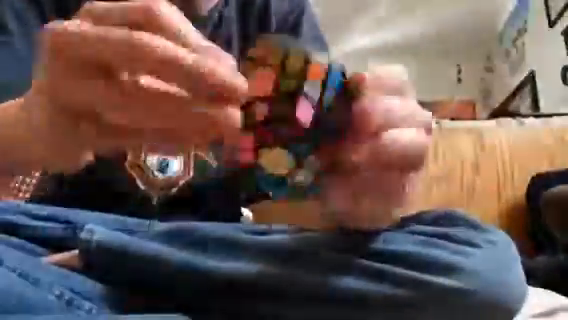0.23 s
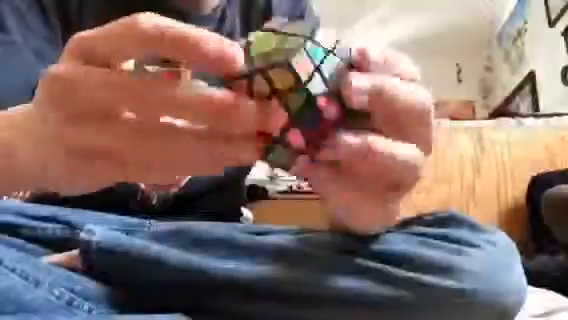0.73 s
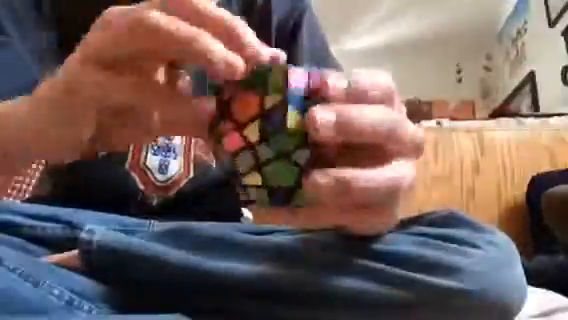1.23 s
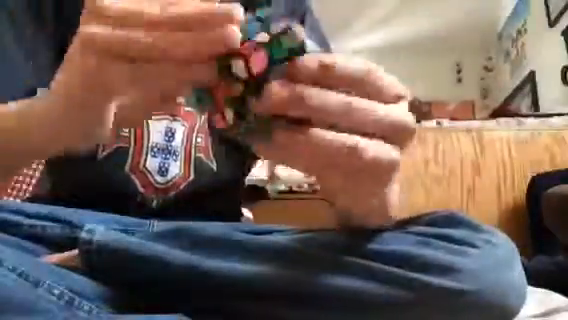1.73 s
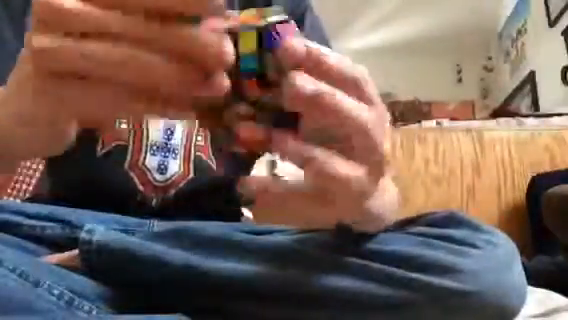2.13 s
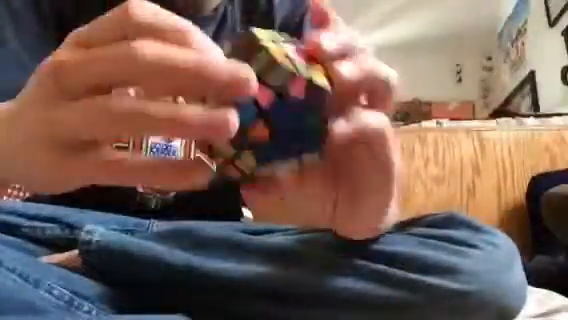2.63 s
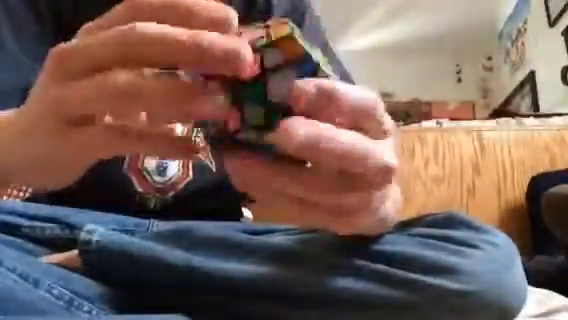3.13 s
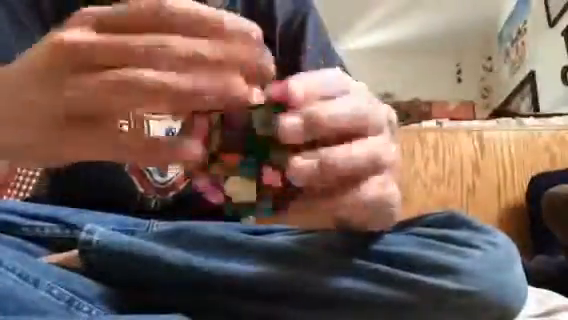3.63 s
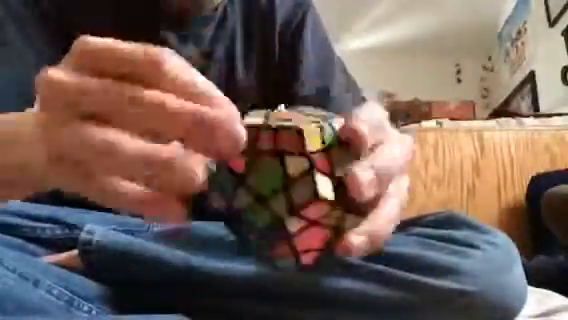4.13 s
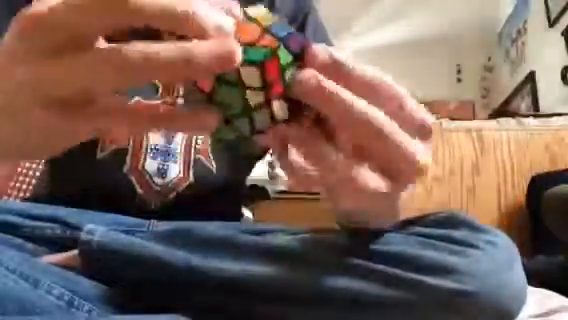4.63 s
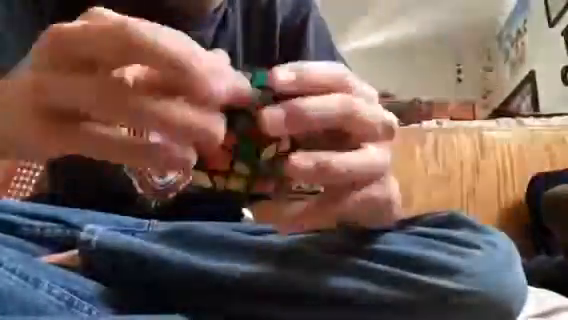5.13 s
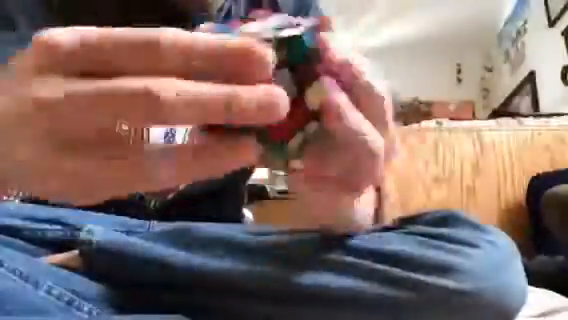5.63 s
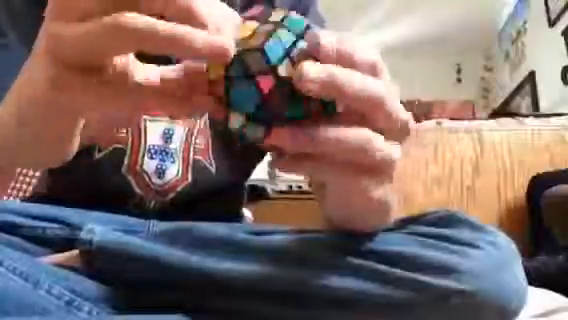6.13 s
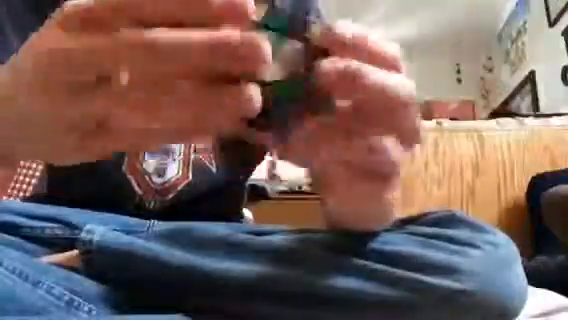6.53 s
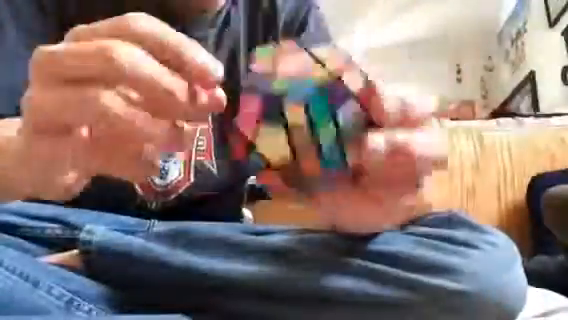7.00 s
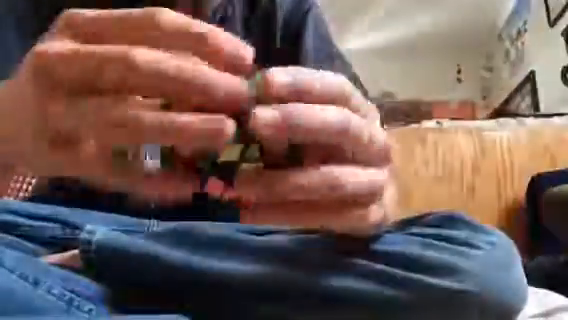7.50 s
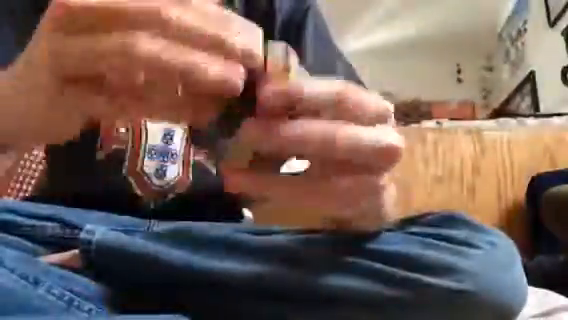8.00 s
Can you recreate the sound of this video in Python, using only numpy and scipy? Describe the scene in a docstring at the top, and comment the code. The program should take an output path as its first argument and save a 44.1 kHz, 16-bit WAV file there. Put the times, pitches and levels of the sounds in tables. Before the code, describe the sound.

Close to the microphone in a quiet room, a small hollow plastic puzzle is twisted by hand. A very loud double snap comes at once, then irregular light clicks, ticks and short dry scrapes. The turning gets denser around four seconds with a cluster of hard clacks, continues unevenly, snaps loudly again near six seconds, thins out, and ends on one more strong clack. Faint hum and hiss lie beneath.

```python
"""Twisty puzzle turned by hand

A small plastic puzzle is turned quickly, close to a microphone in a quiet room. Clicks: noise-burst forces
drive a bright edge snap and the ringing modes of the hollow body. Slides and handling: friction noise made of
tiny slips; thuds: short low sines; floor: hum, rumble, hiss. A block-wise noise suppressor turns quiet moments
down, cutting into the room's answer to each clack."""
import sys
import numpy as np
from scipy import signal
from scipy.io import wavfile
from scipy.ndimage import uniform_filter1d

SR = 44100
rng = np.random.default_rng(int(sys.argv[2]) if len(sys.argv) > 2 else 0)


def to_wav(sig):
    """Store sig (one row per channel, or 1-D mono) as 16-bit WAV at the path in sys.argv[1].

    Samples outside -1..1 are clipped; the rate is SR.
    """
    pcm = np.clip(np.atleast_2d(sig), -1, 1) * 32767
    pcm = np.round(pcm).astype(np.int16)
    wavfile.write(sys.argv[1], SR, pcm.T)  # frames by channels


N = 364266


def amp(db):
    """Decibels to gain."""
    return 10 ** (np.asarray(db) / 20)


def evened(x):
    """Scales to rms 1."""
    return x / np.sqrt(np.mean(x ** 2) + 1e-20)


def per_ms(x):
    """Scales a short sound to the energy of one millisecond at rms 1."""
    energy_ms = np.sum(x ** 2) * 1000 / SR
    return x / np.sqrt(energy_ms + 1e-20)


def read(points, hz):
    """Interpolates a table along a log-frequency axis."""
    f, value = np.transpose(points)
    return np.interp(np.log(hz + 1), np.log(f + 1), value)


def add(mix, start_s, sound):
    """Adds a sound into the mix, in place."""
    part = mix[max(round(start_s * SR), 0):][:len(sound)]
    part += sound[:len(part)]


def causal(gain_db):
    """Minimum-phase impulse response with the given half spectrum."""
    log_gain = np.log(amp(np.r_[gain_db, gain_db[-2:0:-1]]))
    spectrum = np.exp(np.conj(signal.hilbert(log_gain)))
    return np.fft.ifft(spectrum).real


def coloured(x, spectrum, size=4096):
    """Filters x through a spectrum; white input keeps its power."""
    taps = causal(read(spectrum, np.fft.rfftfreq(size, 1 / SR)))
    taps = taps / np.linalg.norm(taps)
    return signal.oaconvolve(x, taps)[:len(x)]


# pieces snapping into line: [t/s, snap level/dB, hollow knock level/dB, brightness (tilt of the snap)]
CLICK_EVENTS = [(0.0884, -10, -19, 6.5), (.0919, -7.5, -19.5, 5.5), (.101, -21, -26.5, 4),
                (0.181, -39.5, -32, 4), (0.21, -37.5, -48, -2), (0.251, -28.5, -62, 5.5),
                (0.2795, -40, -41, -5), (0.3497, -33.5, -35, -1.5), (.44, -36.5, -42.5, -12),
                (0.4793, -43, -43, 7), (0.5108, -44, -39, 0), (.633, -42, -44, 6),
                (.783, -32.5, -34.5, -7.5), (0.959, -42.5, -36.5, 4), (1.2216, -44.5, -40.5, -34),
                (1.2858, -28, -28, -1), (1.2902, -17.5, -22, 3.5), (1.3433, -46, -38, -17),
                (1.3522, -39.5, -41.5, -1), (1.4138, -41.5, -39, -23), (1.4877, -39.5, -43, 5),
                (1.5144, -27, -44.5, -2), (1.5852, -45, -37, -1.5), (1.6331, -46, -31, -16),
                (1.646, -37, -35, 1), (1.69, -30.5, -31.5, 3), (1.7588, -32, -34, -9),
                (1.7898, -40, -42.5, 2), (1.8447, -42, -41, 0), (1.9706, -47, -35, -9),
                (2.003, -45, -44, -5), (2.1073, -25, -31, 4.5), (2.165, -36.5, -44, -5),
                (2.2223, -32.5, -36.5, 1), (2.262, -20.5, -22, -0.5), (2.388, -39.5, -35.5, -14),
                (2.5671, -29.5, -37.5, 2.5), (2.7638, -38, -41, -9), (2.9568, -41, -41.5, -10),
                (2.9976, -38.5, -35.5, -13), (3.2181, -35, -37.5, -19), (3.3522, -36.5, -40.5, -5),
                (3.378, -42, -44, -12), (3.455, -36, -53, -3.5), (3.4886, -23.5, -31.5, -5),
                (3.5208, -25, -25, -3), (3.6822, -25.5, -28, 4.5), (3.692, -23.5, -27.5, 6),
                (3.7088, -32.5, -36.5, -2), (3.8006, -37.5, -55, -2), (3.8147, -29.5, -41.5, -4.5),
                (3.8275, -38.5, -46, -16), (3.868, -33, -36, -6.5), (3.943, -35, -33, 5),
                (3.9813, -32, -35, -6), (4.0315, -31.5, -29, 1), (4.0521, -37.5, -40, -2),
                (4.115, -43, -39, -22), (4.164, -34, -31.5, -2.5), (4.2061, -19, -24.5, 3.5),
                (4.2105, -19, -24.5, 0), (4.2218, -29, -35, 12), (4.2587, -21.5, -22, 6),
                (4.2745, -11, -28, 5), (4.306, -52, -32.5, -5), (4.3344, -37.5, -29.5, 2),
                (4.357, -39, -36, -2), (4.437, -41, -32.5, -2), (4.4531, -46.5, -31, 15),
                (4.4772, -36.5, -36.5, -15), (4.515, -40, -43, -1), (4.54, -42.5, -36, -9),
                (4.597, -42, -33, -4), (4.6112, -38, -40, 8), (4.6269, -37.5, -35.5, 3),
                (4.8124, -42, -33, -1), (4.9274, -44, -39.5, -19), (5.0557, -31.5, -26.5, -3),
                (5.119, -40, -39.5, -14), (5.207, -30, -38, 5), (5.2796, -38, -39.5, -9),
                (5.2905, -25, -34, -1.5), (5.3306, -39, -39, -8), (5.373, -23, -33, 1.5),
                (5.4022, -32.5, -39, -11), (5.4465, -44, -33, 4), (5.5367, -41.5, -37, 9),
                (5.6074, -36, -32, -17), (5.7383, -39, -44, 8), (5.7723, -36, -40, -7),
                (5.7947, -21.5, -30.5, 2.5), (5.8611, -30, -45, -4), (5.885, -32, -32, 4),
                (5.956, -30, -35.5, 3), (5.9769, -29, -29, -12), (6.0093, -36.5, -35, -15),
                (6.064, -9.5, -19.5, 4.5), (6.069, -19.5, -22, -2), (6.072, -32, -19, -9),
                (6.118, -34, -36.5, -0.5), (6.177, -38.5, -40, -4), (6.2721, -41.5, -34, -4),
                (6.2925, -37.5, -39, -4), (6.4418, -40.5, -39.5, -10), (6.5514, -37, -42, 21),
                (6.5796, -36.5, -36.5, -1.5), (6.665, -22, -27.5, 4), (6.856, -44, -37.5, -4.5),
                (7.095, -49, -40.5, -10), (7.323, -45, -39, -8), (7.452, -36.5, -37, -12),
                (7.5068, -23.5, -31.5, -2.5), (7.5944, -37, -39.5, -3), (7.6017, -34.5, -39.5, 0),
                (7.62, -36, -41, -0.5), (7.6582, -26, -26, -1), (7.7183, -44, -40.5, 1),
                (7.767, -37.5, -36, -3), (7.8115, -34, -31, -3), (7.831, -32, -39, 1),
                (7.8453, -34, -33, -6), (7.8826, -35, -27, -9), (7.8986, -36.5, -37.5, -2),
                (8.0058, -27.5, -30.5, -2.5), (8.14, -28.5, -27.5, 0), (8.146, -30.5, -27, -13),
                (8.178, -14.5, -23, 1.5)]
# a glancing snap is brief, a full knock presses longer: [knock over snap level/dB, contact t/s]
CONTACT_TIMES = [(-9, 0.0011), (0, 0.0014)]
# a struck piece tips over and strikes again, softer
REBOUND_S, REBOUND_DB = 0.0039, -18
# the pieces push on the body a moment before the edge snaps free
KNOCK_LEAD_S = 0.0009
# room for the scuff before landing
LEAD_S = 0.008


def clicks(rows, snap_db=0, knock_db=0.0, size=1400):
    """Each impact, with its rebound, is a force that makes a bright snap and a hollow knock."""
    out = np.zeros(N)
    t = np.arange(size) / SR - LEAD_S
    for s, hard_db, hollow_db, brightness in rows:
        contact_s = np.interp(hollow_db - hard_db, *np.transpose(CONTACT_TIMES))
        rebound = amp(REBOUND_DB) * contact(t - REBOUND_S, contact_s)
        force = contact(t, contact_s) + rebound
        add(out, s - LEAD_S, amp(hard_db + snap_db) * snap(force, brightness))
        add(out, s - LEAD_S - KNOCK_LEAD_S, amp(hollow_db + knock_db) * knock(force))
    return out


def contact(t, contact_s, chatter_db=-17, chatter_s=0.0041, scuff_db=-16, scuff_s=0.0015):
    """Noisy force: an edge scuffs up to its stop, lands at t = 0 and chatters against its neighbours."""
    chatter = amp(chatter_db) * np.exp(-abs(t) / chatter_s)
    landing = np.exp(-abs(t) / contact_s) + chatter
    scuff = amp(scuff_db) * np.exp(-abs(t) / scuff_s)
    return rng.standard_normal(len(t)) * np.where(t < 0, scuff, landing)


# colour of a plastic edge snapping, before the brightness tilt: [f/Hz, level/dB]
SNAP_COLOUR = [(300, -35), (1000, -32), (2000, -9), (3000, -11.5), (5100, -0.5), (6200, -1.5), (7700, -1),
               (9500, -8), (12000, -13.5), (14500, -17), (16500, -30)]


def snap(force, brightness):
    """The bright crack of the stiff plastic edge; a sharper contact lifts the top over the middle."""
    hz = np.fft.rfftfreq(len(force), 1 / SR)
    tilt_db = brightness * read([(4000, -0.78), (11000, 0.88)], hz)
    taps = causal(read(SNAP_COLOUR, hz) + tilt_db)
    return per_ms(signal.fftconvolve(force, taps)[:len(force)])


# modes of the hollow body: [nominal f/Hz, relative level/dB, longest t60/s]
BODY_MODES = [(461, -7.5, 0.01), (590, -3, 0.0083), (720, -11, 0.01), (1200, -3.5, 0.017),
              (1392, 0.5, 0.01), (1654, -3, 0.011), (1791, -12.5, 0.0048), (2160, -6, 0.0064)]


def knock(force, detune=0.04, damping=0.15):
    """The same force rings the body; each grip shifts and damps its modes anew."""
    t = np.arange(len(force)) / SR
    hz, db, t60_s = np.transpose(BODY_MODES)[:, :, None]
    shift, side = rng.standard_normal((2, len(BODY_MODES), 1))
    ring_s = t60_s * np.exp(-damping * abs(side))
    decay = np.sign(side) * amp(db - 60 * t / ring_s)
    modes = decay * np.sin(2 * np.pi * hz * (1 + detune * shift) * t)
    return per_ms(signal.fftconvolve(force, modes.sum(0))[:len(t)])


# a face sliding freely through a longer turn: [start t/s, length t/s, relative level/dB]
SLIDE_EVENTS = [(0.09, .037, -39), (1.307, 0.048, -46.5), (1.629, 0.033, -45.5), (1.897, 0.043, -50.5),
                (1.982, 0.03, -42), (2.208, 0.031, -46), (2.317, 0.032, -48), (2.541, 0.029, -43.5),
                (2.992, 0.018, -45), (3.05, 0.031, -48), (3.123, 0.024, -47), (3.498, 0.043, -43),
                (3.667, 0.035, -39.5), (3.748, 0.024, -45.5), (3.848, .04, -45), (4.265, 0.017, -27),
                (4.429, 0.027, -47.5), (4.553, .051, -47.5), (4.723, 0.014, -43), (5.037, .04, -40.5),
                (5.121, 0.028, -49.5), (5.451, 0.076, -47), (5.699, 0.066, -50), (5.876, 0.025, -45.5),
                (5.975, 0.063, -49.5), (6.124, .044, -45.5), (6.534, 0.043, -46.5), (7.646, 0.034, -35),
                (7.81, 0.037, -56), (7.933, 0.042, -46.5)]
# colour of plastic rubbing on plastic: [f/Hz, relative level/dB]
RUB_COLOUR = [(150, -12.5), (400, 0), (900, -3.5), (1250, 10), (1700, 6), (3000, -1.5), (5000, 1),
              (7500, -2.5), (10000, -4), (14500, -10.5), (16500, -24)]


def slides(level_db=-2, taper=0.64, jolt_db=-9):
    """Pieces scrape over each other during a slide, and catch now and then on an edge."""
    out = np.zeros(N)
    jolts = grit(per_s=68, spread_db=0.5, smooth=0)
    slips = grit(per_s=550, spread_db=3.0, smooth=0.15) + amp(jolt_db) * jolts
    for start_s, length_s, db in SLIDE_EVENTS:
        stroke = slips[round(start_s * SR):][:max(round(length_s * SR), 20)]
        swell = signal.windows.tukey(len(stroke), taper)
        add(out, start_s, amp(db + level_db) * evened(stroke) * swell)
    return coloured(out, RUB_COLOUR)


def grit(per_s, spread_db, smooth):
    """Tiny slips of uneven size, each a brief rasp, over smooth friction noise; rms 1."""
    happens = rng.random(N) < per_s / SR
    sizes = amp(spread_db * np.minimum(rng.exponential(1, N), 3)) * happens
    rasp = evened(signal.oaconvolve(sizes, signal.windows.hann(40))[:N])
    return evened((rasp + smooth) * rng.standard_normal(N))


# how busily the fingers shift their grip on the loose pieces: [t/s, relative level/dB]
HANDLING_CURVE = [(0, -52.5), (.4, -66), (.6, -66), (1.15, -66.5), (1.399, -61), (1.798, -61), (2.3, -62),
                  (2.8, -72), (3.05, -64.5), (3.3, -66), (3.6, -64), (4.1, -63.5), (4.45, -59), (4.95, -63),
                  (5.449, -59.5), (5.85, -56.5), (6.348, -65), (7.3, -70), (7.95, -58.5), (8.25, -63)]


def handling(rub_db=0.5, tick_db=6.0, hollow_db=3, dull_db=0, spread_db=4, count=320):
    """Skin rubs faintly on the faces, and loose pieces tick at random under the fingers."""
    s, db = np.transpose(HANDLING_CURVE)
    grip = amp(np.interp(np.arange(N) / SR, s, db) + rub_db)
    rub = coloured(grip * grit(per_s=240, spread_db=8, smooth=0.65), RUB_COLOUR)
    when_s = rng.uniform(LEAD_S, N / SR, count)
    spread = np.clip(rng.standard_normal((count, 3)), -2, 2)
    hard, hollow, brightness = spread_db * spread.T
    level_db = np.interp(when_s, s, db) + tick_db
    ticks = zip(when_s, level_db + hard, level_db + hollow + hollow_db, brightness + dull_db)
    return rub + clicks(ticks)


# dull low thuds, the first under the opening clack: [t/s, peak level/dB, f/Hz, length t/s]
THUD_EVENTS = [(.088, -30, 570, .011), (4.554, -42, 172, .026), (6.464, -43, 430, .012)]


def thuds(taper=0.73):
    """Dull, low thuds: sines that swell and fade."""
    out = np.zeros(N)
    for s, db, hz, length_s in THUD_EVENTS:
        t = np.arange(0, length_s, 1 / SR)
        swell = signal.windows.tukey(len(t), taper)
        add(out, s, amp(db) * swell * np.sin(2 * np.pi * hz * t))
    return out


# room decay: [f/Hz, t60/s]
ROOM_DECAY = [(300, 0.57), (1500, 0.3), (14000, 0.084)]


def room(x, first_s=0.0037, near_db=9, near_s=0.0075, size=16384):
    """Close reflections from hands and lap, then a short tail that is duller the later it comes."""
    echoes_per_s = 3000
    taps = rng.choice([-1., 1.], size) * (rng.random(size) < echoes_per_s / SR)
    late_s = np.arange(size) / SR - first_s
    taps *= (late_s > 0) * (1 + amp(near_db) * np.exp(-abs(late_s) / near_s))
    hz, t, bands = signal.stft(taps, SR, nperseg=128)
    decay = amp(-60 * t / read(ROOM_DECAY, hz)[:, None])
    tail = signal.istft(bands * decay, SR)[1]
    return signal.fftconvolve(x, tail / np.linalg.norm(tail))[:N]


# faint mains and appliance hum: [f/Hz, rms level/dB]
HUM_TONES = [(65, -76), (120, -70.5)]
# colour of the low room noise: [f/Hz, relative level/dB per Hz]
RUMBLE_COLOUR = [(13, -42.5), (25, -12.5), (55, -5.5), (80, -7), (100, -11), (150, -6.5), (220, -7.5),
                 (320, -10.5), (400, -18), (600, -50)]
# colour of the hiss: [f/Hz, relative level/dB per Hz]
HISS_COLOUR = [(200, -34), (400, -1.5), (800, -7.5), (1300, -12), (2500, -18.5), (6000, -23.5),
               (15000, -23.5)]
RUMBLE_DB, HISS_DB = -61.5, -61  # rms


def floor():
    """Low rumble and hum of the house as filtered noise and sines, and an even hiss."""
    low, high = rng.standard_normal((2, N))
    t = np.arange(N) / SR
    hum = np.zeros(N)
    for hz, db in HUM_TONES:
        hum += amp(db) * evened(np.sin(2 * np.pi * (hz * t + rng.random())))
    rumble = amp(RUMBLE_DB) * coloured(low, RUMBLE_COLOUR, size=16384)
    hiss = amp(HISS_DB) * coloured(high, HISS_COLOUR)
    return hum + rumble + hiss


def scene(room_db=-18, small_hz=260):
    """The puzzle in its room; so small a body radiates little bass."""
    puzzle = clicks(CLICK_EVENTS) + slides() + handling()
    high_pass = signal.butter(2, small_hz, "high", fs=SR, output="sos")
    puzzle = signal.sosfilt(high_pass, puzzle)
    mix = puzzle + amp(room_db) * room(puzzle) + thuds() + floor()
    return mix[None]


# suppressor block length, and how much of the first has passed at t = 0 (samples)
BLOCK, BLOCK_LEAD = 1102, 902


def suppress(x, shut_db=-53, open_db=-39, depth_db=-10, loud_db=-41, split_hz=250):
    """Above the bass, quiet blocks are turned down, and further still just after a loud one."""
    bass = signal.sosfiltfilt(signal.butter(2, split_hz, fs=SR, output="sos"), x)
    upper = x - bass
    block = (np.arange(N) + BLOCK_LEAD) // BLOCK
    block_db = 10 * np.log10(np.bincount(block, upper ** 2) / BLOCK + 1e-14)
    before_db = np.r_[block_db[0], block_db[:-1]]
    drop_db = np.clip(before_db - np.maximum(block_db, loud_db), 0, 22)
    gain_db = np.interp(block_db, [shut_db, open_db], [depth_db, 0]) - 0.5 * drop_db
    return bass + upper * amp(uniform_filter1d(gain_db[block], size=30))


EDGE_HZ = 15600


def record(dry):
    """Noise suppression, a gentle rounding of the very sharpest peaks, then the band limit."""
    rounded = np.tanh(suppress(dry[0]))
    low_pass = signal.firwin(161, EDGE_HZ, window=("kaiser", 8), fs=SR)
    return signal.oaconvolve(rounded, low_pass, "same")[None]


dry = scene()
out = record(dry)
to_wav(out)
```